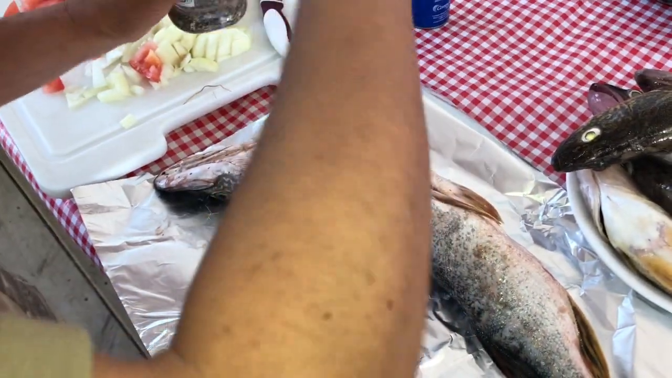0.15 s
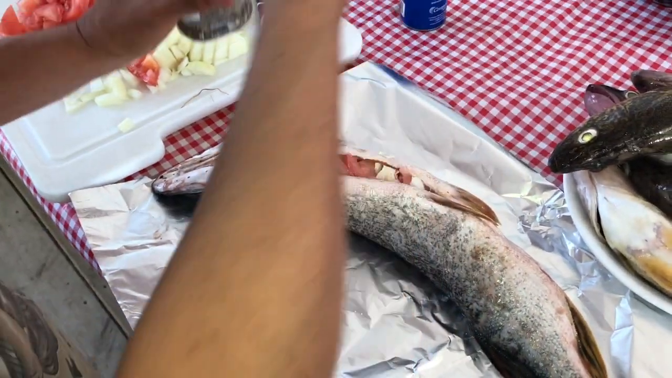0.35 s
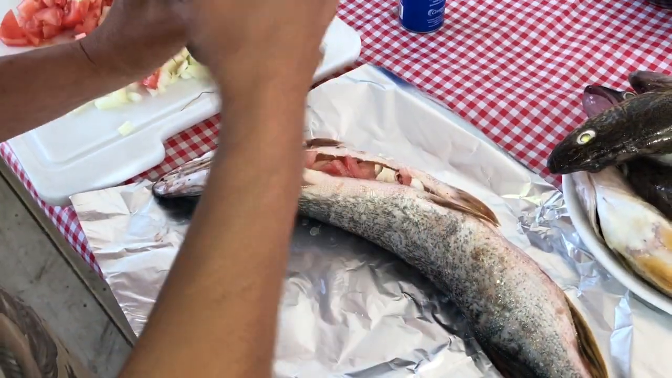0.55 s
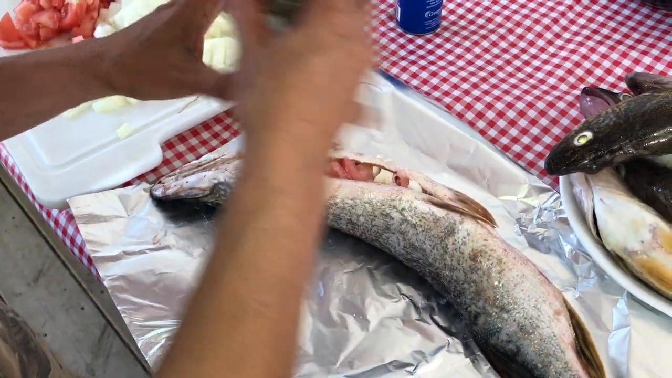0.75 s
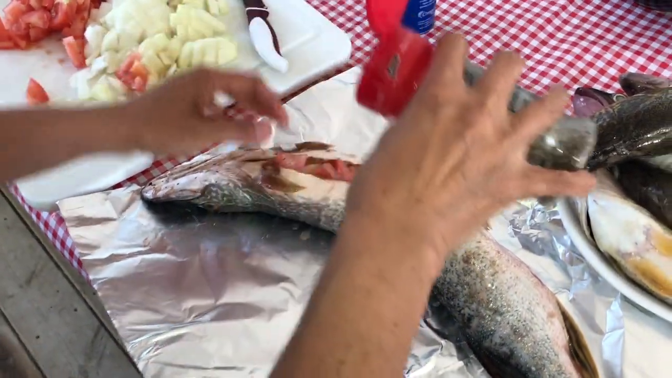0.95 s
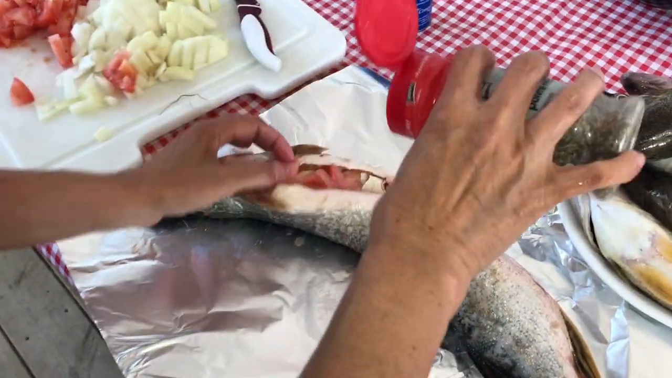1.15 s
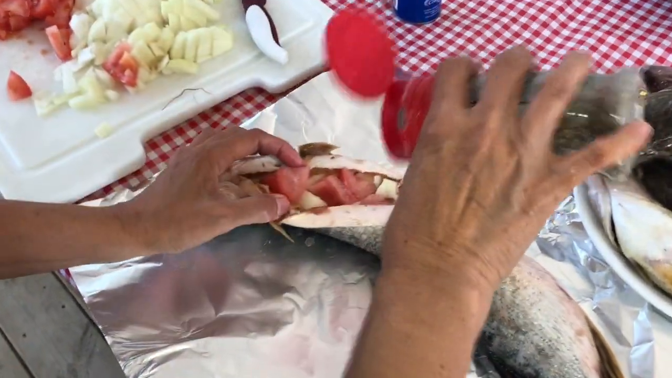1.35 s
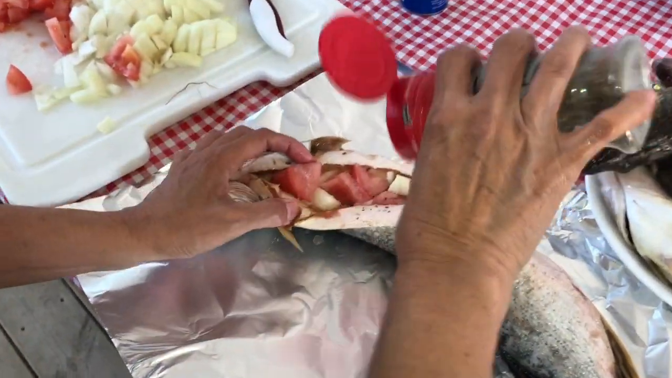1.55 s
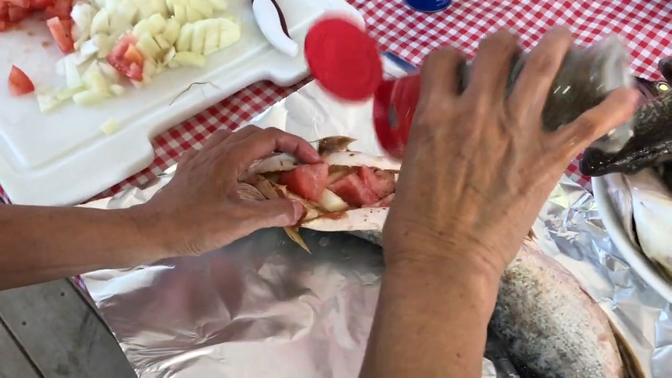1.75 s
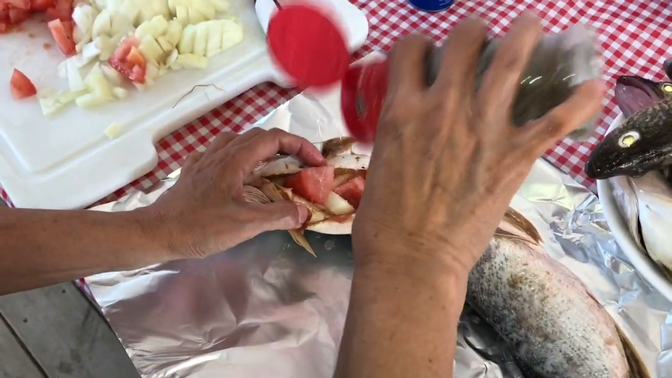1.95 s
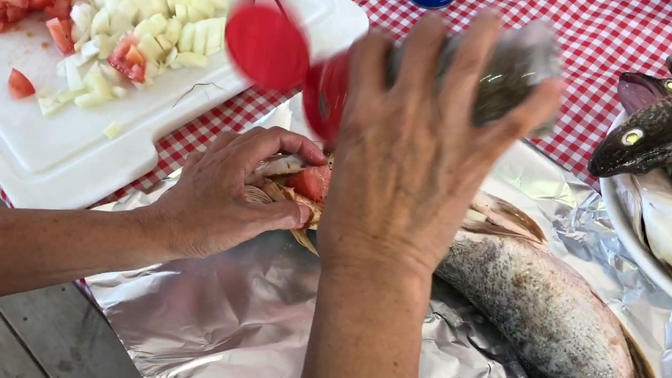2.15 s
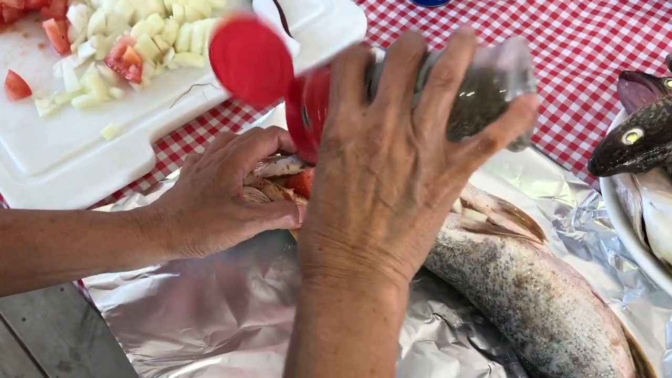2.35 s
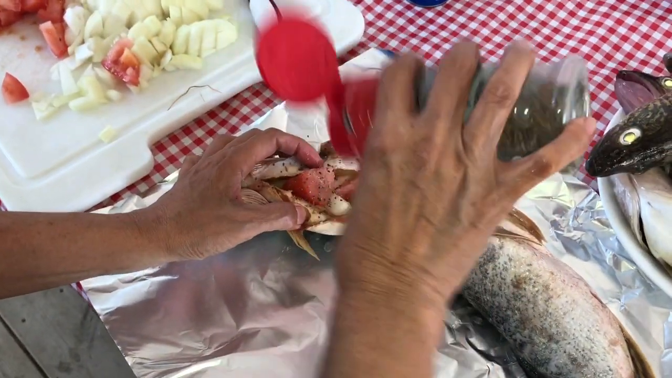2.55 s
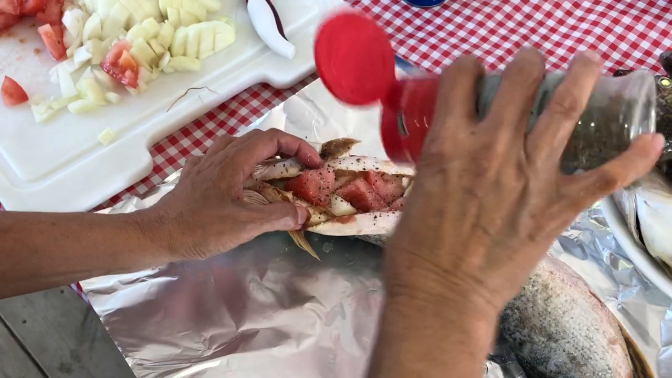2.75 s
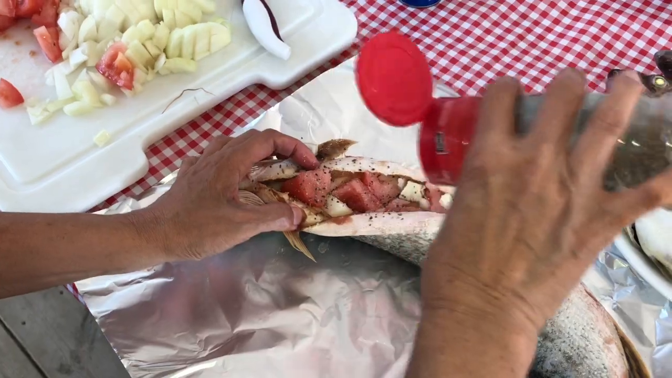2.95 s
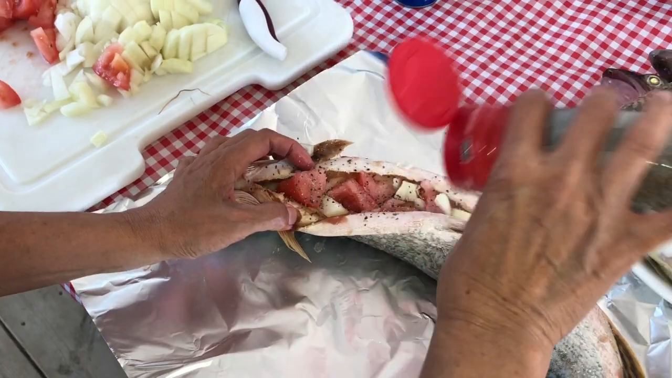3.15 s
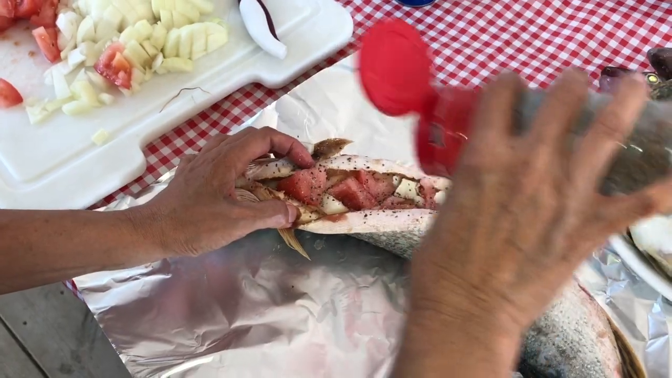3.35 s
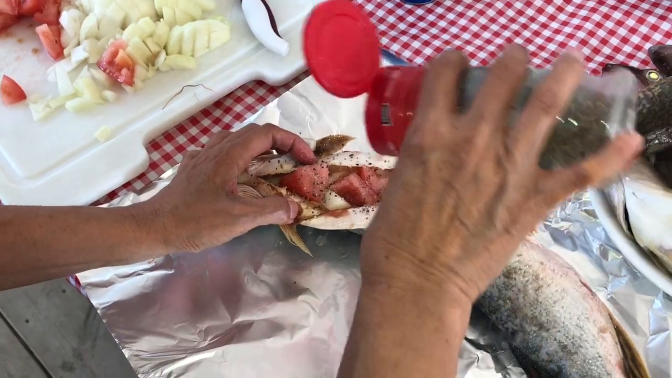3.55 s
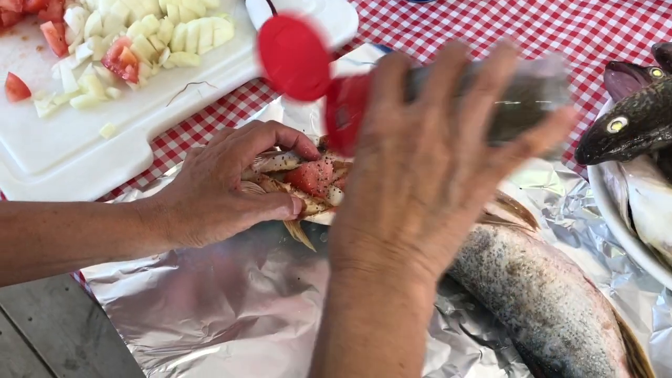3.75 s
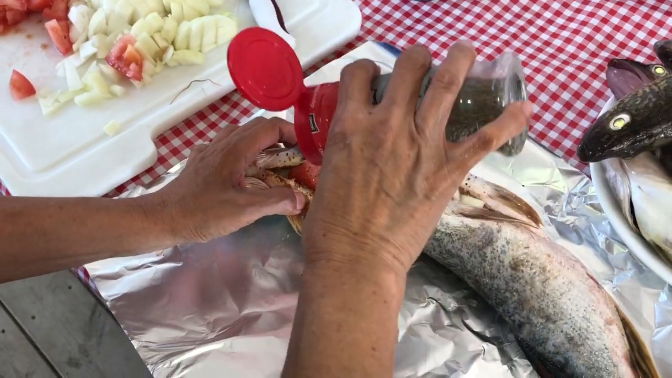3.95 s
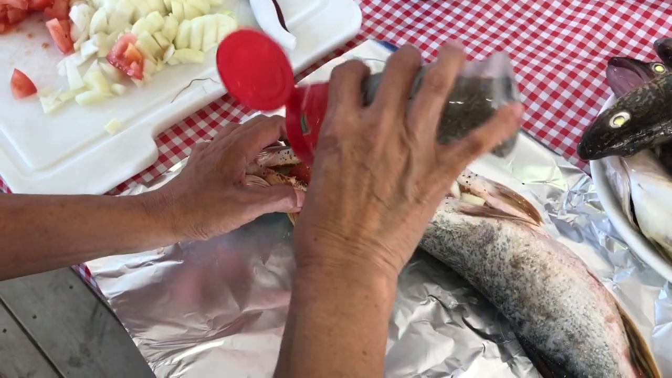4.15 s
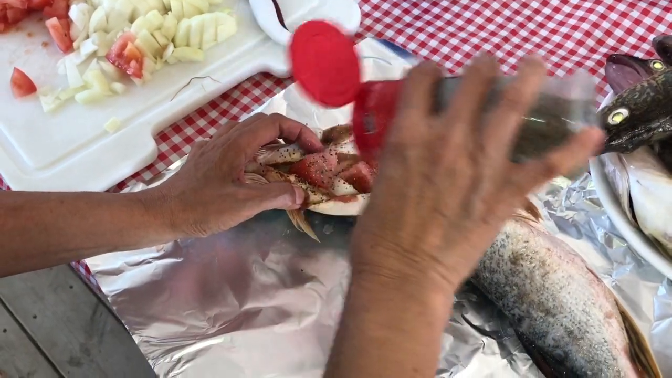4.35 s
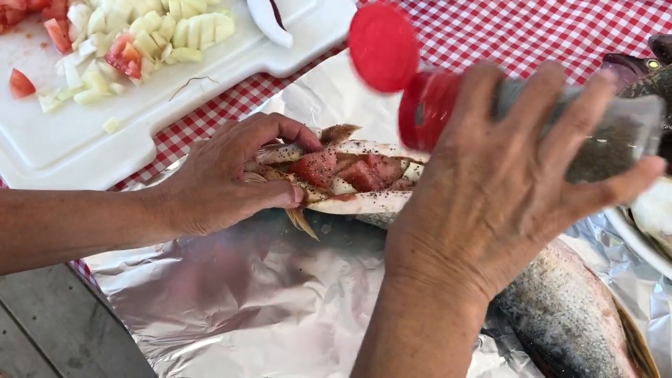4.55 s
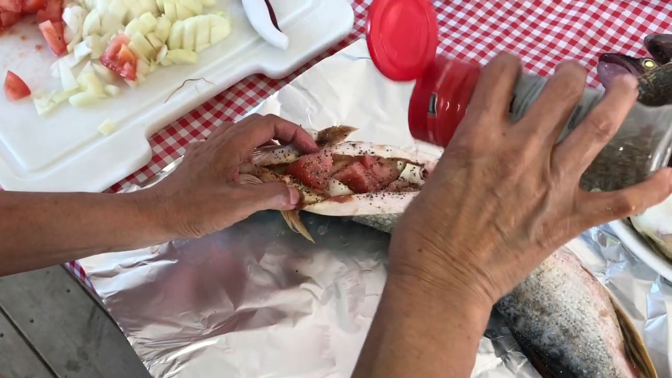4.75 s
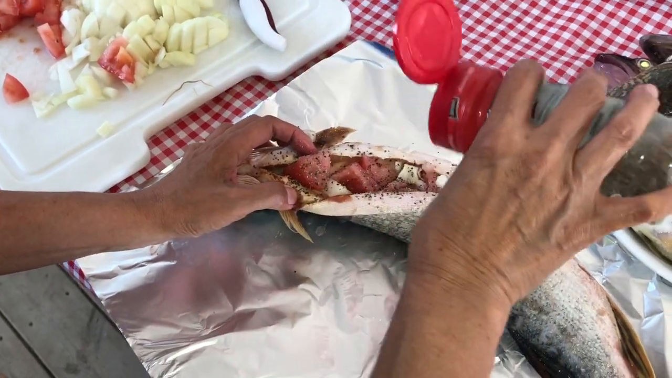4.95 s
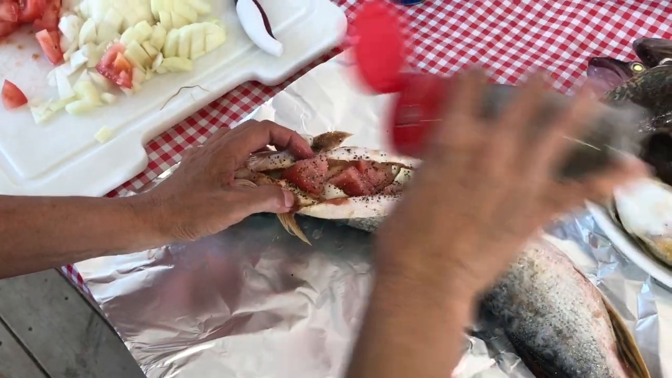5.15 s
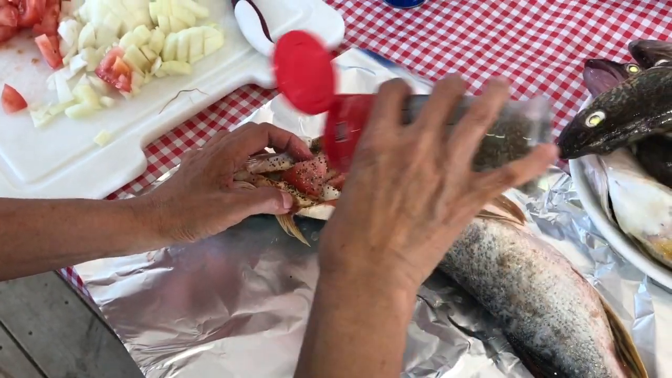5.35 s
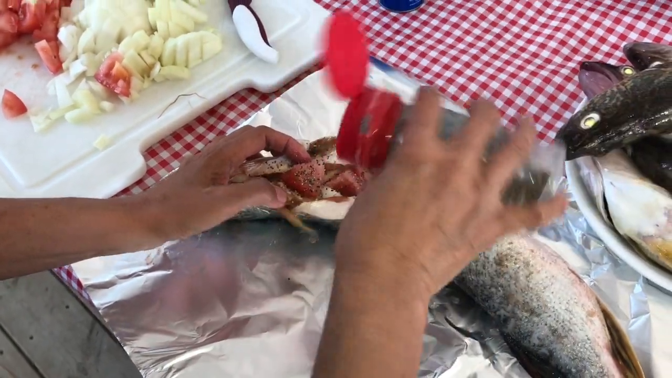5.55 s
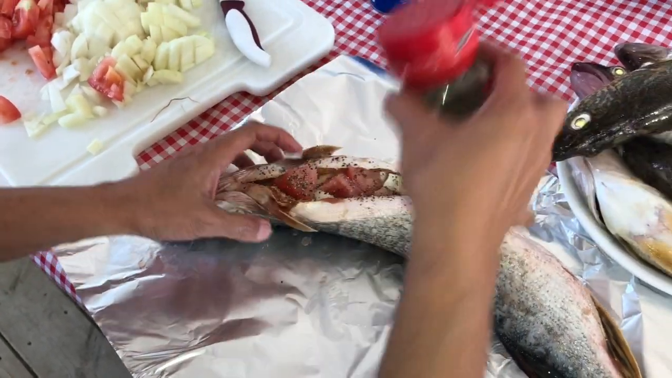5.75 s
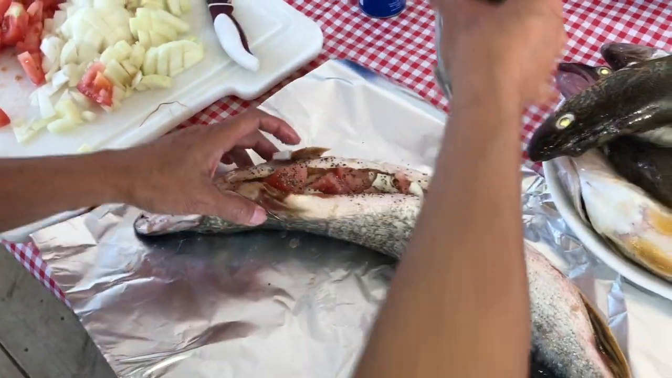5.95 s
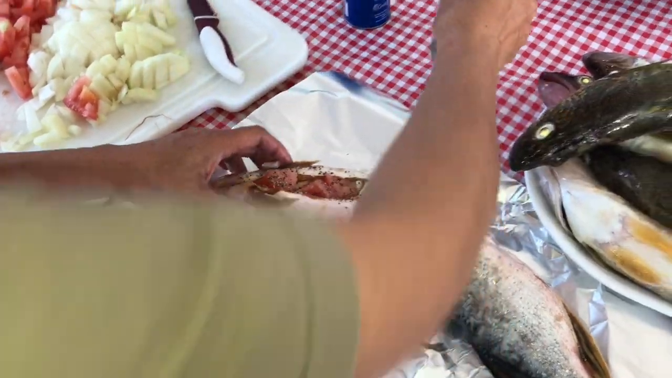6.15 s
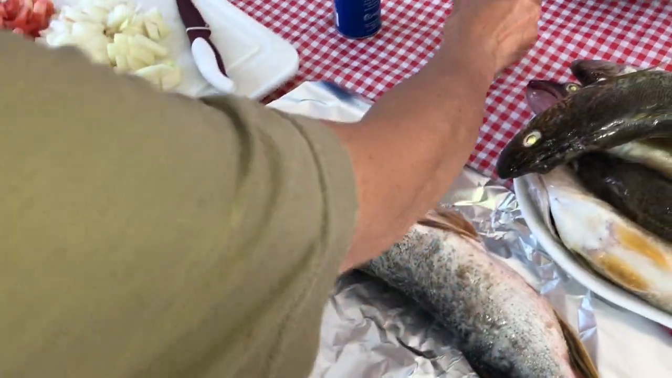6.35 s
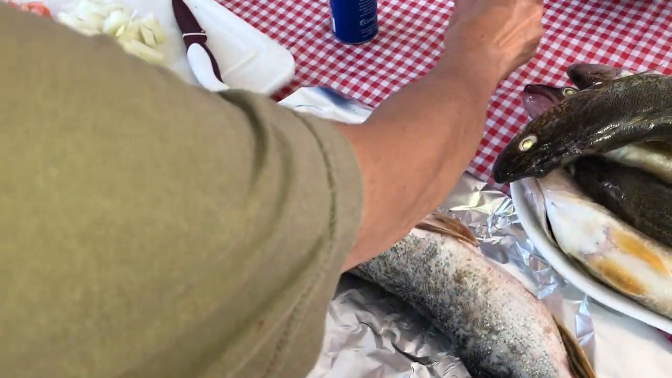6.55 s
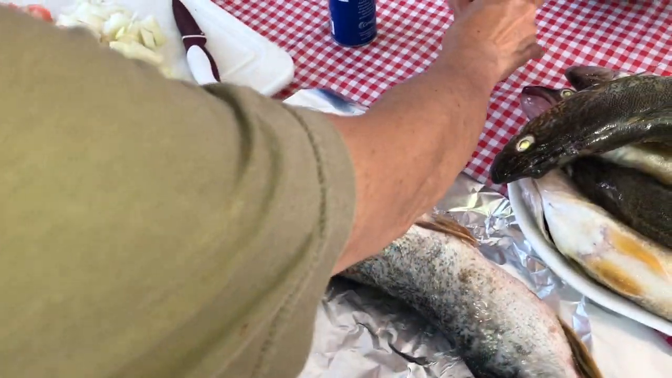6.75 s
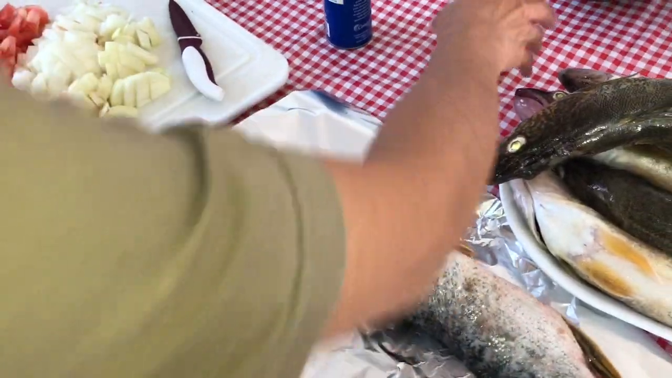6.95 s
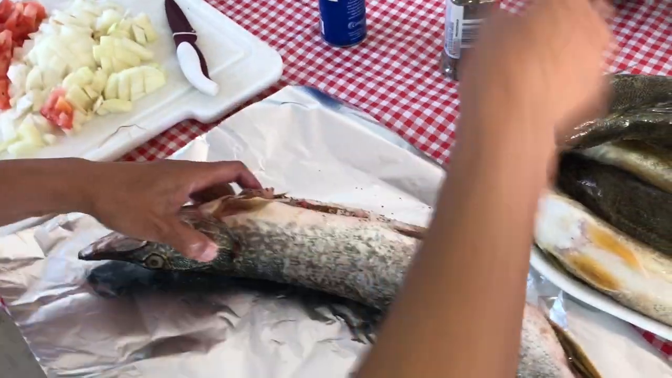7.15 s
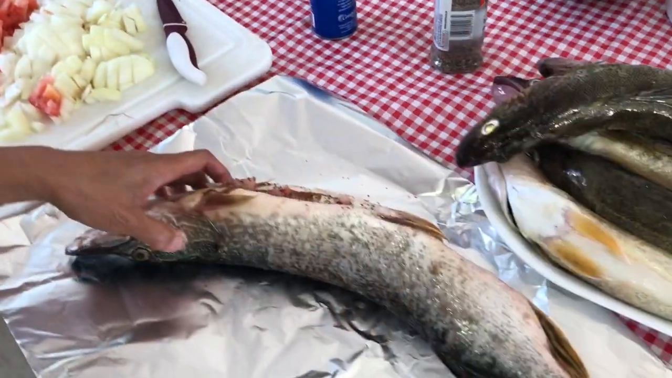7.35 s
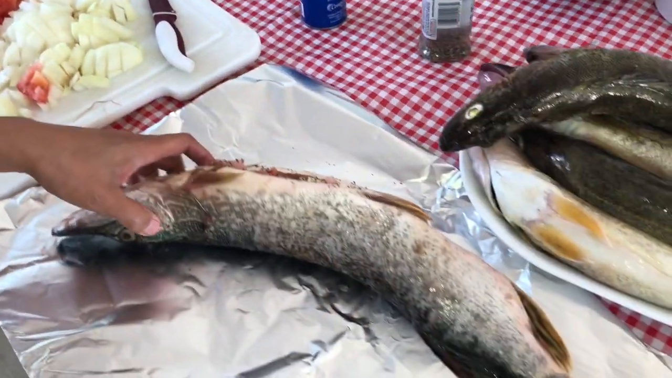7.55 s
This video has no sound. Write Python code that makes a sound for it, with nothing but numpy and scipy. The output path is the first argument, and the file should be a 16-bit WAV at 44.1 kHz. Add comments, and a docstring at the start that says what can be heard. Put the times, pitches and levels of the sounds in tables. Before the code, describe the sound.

Close, dry outdoor sound: a steady low motor hum and distant rumble, with a very faint cicada. Light finger ticks come first, then foil snaps and rustles. A jar of coarse pepper is shaken about five times a second in soft grainy swells, with a brief pause. A closer cicada takes over. The jar is knocked down and its lid snaps shut, then foil crumples sharply to the end.

```python
"""A motor hums over a far rumble, with a faint far cicada and light finger ticks; then foil starts to snap.
Coarse pepper is shaken from a plastic jar over a fish on foil: swells of noise patter as the grains slide.
Foil is crumpled (clumped noise), snaps (click, bright noise, modes) and pops (short mode clusters).
The jar is put down and its lid clicked shut: ringing modes, noise clatter, low sine jolts in the table.
The far cicada fades and a nearer one takes over, both as harmonics of an even click rate."""
import sys
import numpy as np
from scipy import signal
from scipy.fft import rfft, irfft, next_fast_len
from scipy.io import wavfile

SR = 44100
rng = np.random.default_rng(int(sys.argv[2]) if len(sys.argv) > 2 else 0)


def attenuation_scalar(level_db):
    """Turn a level in dB into a linear amplitude multiplier (20 dB per decade)."""
    decades = np.asarray(level_db, float) / 20
    return 10 ** decades


def log_audio(samples):
    """Write samples as a 16-bit WAV file to the path given in sys.argv[1]."""
    # one column per channel
    frames = np.atleast_2d(samples).T
    # limit to full scale, then quantise
    limited = np.clip(frames, -1, 1)
    pcm = np.round(limited * 32767).astype(np.int16)
    wavfile.write(sys.argv[1], SR, pcm)


N = 338688

# far rumble and hiss, spectrum: (frequency [Hz], relative density [dB per Hz])
AIR_SPECTRUM = [(30, -28), (45, -17), (85, -15), (140, -3), (175, -9.5), (230, -13.5), (280, -23.5),
                (345, -17), (460, -17.5), (645, -24.5), (900, -27), (1500, -33.5), (3000, -41), (7500, -44),
                (9500, -50), (15700, -52), (16000, -73)]
AIR_DB, HUM_DB, HUM_HZ = -47, -49.5, 164.3
# faint narrow bands of the motor above its tone: (centre [Hz], width [Hz], level [dB])
MOTOR_NOISE_BANDS = [(484.6, 15, -65.5), (644.8, 17, -66.5)]

# cicada loudness: (time [s], level [dB])
FAR_CICADA_LEVEL = [(0, -76.5), (3.0, -73), (3.5, -99)]
NEAR_CICADA_LEVEL = [(3.5, -99), (3.75, -64), (4.5, -64.5), (5.5, -63), (6.501, -61.5), (7.4, -63.5)]
# cicada click rates: (time [s], rate [clicks/s])
FAR_CLICK_RATE = [(0, 204.7), (3.0, 205)]
NEAR_CLICK_RATE = [(3.7, 174.8), (4.1, 175.3), (4.5, 175.8), (4.9, 176.2), (5.5, 176.6), (6.5, 177.05),
                   (7.5, 177.2)]
# tymbal resonance: (frequency [Hz], relative level [dB])
TYMBAL_RESPONSE = [(4900, -17), (5600, -1.5), (6800, 0), (7500, -1), (8100, -1), (8900, -5), (10500, -8)]
# near-cicada harmonics that stand out a while: (multiple of click rate, middle [s], half length [s], lift [dB])
NEAR_STANDOUT = [(31, 6.6, .8, 7), (32, 4.6, .9, 6), (36, 4.6, .35, 12), (41, 6.8, 1.5, 13),
                 (43, 5.4, 1.9, 10), (44, 4.85, .3, 9), (47, 4.35, .3, 11)]

# ticks of fingers on lid and foil: (time [s], rate [ticks/s])
FINGER_TICK_RATE = [(0, 5.5), (.5, 3.4), (.7, 26), (1.2, 29), (1.4, 6.9)]
TICK_BASE_DB = -42

# foil snaps: (time [s], strength [dB], strongest frequency [Hz], tail t60 [s])
FOIL_SNAPS = [(0.1167, -44, 8600, 0.037), (0.551, -37.5, 7300, 0.065), (0.643, -43, 11900, 0.11),
              (1.1928, -40, 3470, 0.019), (1.21, -34, 5000, 0.064), (1.2259, -27.5, 3360, 0.041),
              (1.25, -31.5, 8100, 0.026), (1.268, -33, 5460, 0.066), (1.295, -39, 3260, .05),
              (1.3178, -33.5, 3130, 0.038), (1.3965, -39, 4070, 0.17), (1.5049, -26, 4770, 0.0025),
              (2.0751, -32, 4870, 0.22), (2.3936, -34.5, 4500, 0.047), (3.0813, -31.5, 5540, 0.1),
              (3.113, -37.5, 5570, 0.2), (3.162, -36, 6260, 0.073), (3.205, -38.5, 6100, 0.34),
              (3.323, -31.5, 6700, 0.11), (3.411, -38.5, 9500, 0.098), (3.4708, -41.5, 9300, 0.19),
              (3.5065, -44, 11600, 0.15), (4.155, -32.5, 7840, 0.14), (5.1207, -29, 4200, 0.19),
              (5.1943, -36.5, 3720, 0.24), (5.343, -37, 5940, 0.24), (5.5814, -35, 4200, 0.18),
              (5.716, -44, 3260, 0.12), (5.748, -35, 5900, 0.11), (5.8267, -31.5, 5200, 0.1),
              (5.8644, -32, 3530, 0.055), (5.9, -34.5, 5460, 0.082), (5.958, -29, 2830, 0.22),
              (6.002, -24.5, 6160, 0.05), (6.017, -20, 7530, 0.09), (6.035, -23.5, 8000, 0.076),
              (6.054, -28, 7400, 0.077), (6.179, -26, 5900, 0.17), (6.281, -25, 4240, 0.14),
              (6.351, -29.5, 4980, 0.2), (6.6703, -25.5, 4700, 0.043), (6.6898, -33.5, 5270, 0.13),
              (6.7213, -28, 4960, 0.16), (6.8, -35, 7160, 0.52), (7.1174, -33, 5100, 0.067),
              (7.441, -34, 4040, 0.13), (7.528, -22, 5700, 0.096), (7.5526, -15, 6550, 0.16)]
# click over tail for t60 0.1 s and strength -34 dB; longer tails and stronger snaps start softer
CLICK_DB, CLICK_DB_PER_DOUBLED_T60, CLICK_DB_PER_STRENGTH_DB = 2.5, -2, -0.2
# popping foil dents: (time [s], strength [dB], pitch [Hz], t60 [s])
FOIL_POPS = [(.703, -43.5, 4180, 0.011), (1.481, -45, 1010, .03), (1.513, -43.5, 980, 0.041),
             (5.122, -57, 2680, 0.063), (7.4462, -34, 1905, 0.015), (7.452, -33.5, 2090, 0.058),
             (7.468, -35.5, 1590, 0.07), (7.532, -30, 2060, 0.062), (7.575, -28.5, 1914, 0.088),
             (7.646, -28.5, 1740, 0.031)]

# jar shakes, grains hitting the lid end: (middle [s], level [dB])
JAR_SHAKES = [(1.076, -68), (1.58, -58.5), (1.788, -53), (1.942, -55), (2.0, -53), (2.206, -48.5),
              (2.414, -55), (2.608, -52), (2.798, -52.5), (2.965, -57.5), (3.626, -58.5), (3.797, -64),
              (3.96, -65), (4.135, -60.5), (4.335, -55.5), (4.518, -56.5), (4.689, -58), (4.877, -55),
              (5.037, -56.5), (5.297, -57.5), (5.526, -59), (5.656, -58)]
# grain patter spectrum: (frequency [Hz], relative density [dB per Hz])
GRAIN_SPECTRUM = [(1000, 0), (1800, -6), (2600, -1), (5000, 1.5), (6700, -0.5), (11000, -1.5), (15700, -4),
                  (16000, -30)]
SHAKE_HALF_S = 0.033  # middle to 1/e of the amplitude
SLIDE_LEAD_S, SLIDE_DB = 0.056, -4.5  # a weaker slide leads each shake

# foil dragged and crumpled under hand and arm: (start [s], hold [s], level [dB])
FOIL_CRUMPLES = [(1.22, 0.14, -55), (1.407, 0.067, -60.5), (3.21, 0.071, -63), (3.388, 0.082, -66),
                 (5.712, 0.38, -51.5), (6.173, 0.25, -50.5), (6.689, 0.19, -41), (6.882, 0.033, -38),
                 (6.975, 0.061, -51.5), (7.055, .005, -44.5), (7.117, 0.018, -45.5), (7.179, 0.021, -35),
                 (7.477, 0.0046, -45), (7.572, 0.0084, -31), (7.635, 0.046, -38.5)]
# crumpling foil spectrum: (frequency [Hz], relative density [dB per Hz])
RUSTLE_SPECTRUM = [(410, -34), (700, 0.5), (1370, 1), (2390, 7.5), (5430, 9), (9100, 3), (15200, -4),
                   (15800, -8), (16100, -47)]
CRUMPLE_RISE_DB_PER_S, CRUMPLE_FALL_DB_PER_S = 431, 231

# knocks on jar and table: (time [s], strength [dB], contact cut-off [Hz], clatter t60 [s])
JAR_KNOCKS = [(2.163, -30, 1300, 0.33), (2.18, -31.5, 1300, 0.13), (2.198, -31.5, 1300, 0.56),
              (2.45, -40, 2530, 0.24), (3.049, -39.5, 1480, 0.48), (3.532, -36, 1850, 0.14),
              (6.37, -31.5, 3000, 0.055), (6.3727, -14, 750, 0.13), (6.5652, -8.5, 16200, 0.013),
              (6.5762, -23.5, 12800, 0.13), (6.5793, -16.5, 1960, 0.2), (6.601, -35, 2200, 0.1)]
# jar modes: (frequency [Hz], relative level [dB], t60 [s])
JAR_MODES = [(265, -22, 0.23), (496, -4, 0.094), (773, -3.5, 0.1), (1073, -12.5, 0.1), (1192, -9, .08),
             (1244, -6, 0.059), (1454, -12, 0.13), (1600, 14, 0.0035), (1710, -10, 0.06), (2220, -10, .1),
             (2540, -8, 0.09), (3570, 2, 0.0068), (14400, 7.5, 0.0033)]
# jolts through table and microphone stand: (time [s], level before the swell [dB], pitch [Hz], t60 [s])
TABLE_BUMPS = [(2.164, -22, 280, 0.075), (2.172, -25.5, 87, .17), (2.178, -28, 193, 0.11),
               (2.196, -26.5, 244, 0.12), (2.237, -24, 81, 0.13), (2.196, -27.5, 49.7, 0.43),
               (2.284, -26, 80, 0.1), (6.376, -19, 274, 0.044), (6.3816, -22.5, 173, 0.053),
               (6.5672, -16.5, 383, 0.018), (6.577, -21, 226, 0.044), (6.578, -30, 110, 0.12)]
BUMP_RISE_S = 0.002


def rms_one(x):
    """Scale to rms 1."""
    return x / np.sqrt(np.mean(x ** 2) + 1e-20)


def in_time(rows):
    """Columns of a curve, one value a sample."""
    time_s, *columns = np.transpose(rows)
    return [np.interp(np.arange(N) / SR, time_s, column) for column in columns]


def at_hz(points, hz):
    """Read a spectrum, linear in dB over log frequency."""
    table_hz, table_db = np.transpose(points)
    return np.interp(np.log(hz), np.log(table_hz), table_db)


def drift(corner_hz):
    """Slow random wander of rms 1: noise through two equal poles, run at SR / 40."""
    pole = np.exp(-80 * np.pi * corner_hz / SR)
    white = rng.standard_normal(N // 40 + 4002)
    slow = signal.lfilter([1], [1, -2 * pole, pole * pole], white)[4000:]  # past the start-up
    return np.interp(np.arange(N) / 40, np.arange(len(slow)), rms_one(slow))


def cut(x, hz, kind, order=2):
    """Butterworth filter."""
    safe_hz = np.clip(hz, 10, .45 * SR)
    return signal.sosfilt(signal.butter(order, safe_hz, kind, fs=SR, output="sos"), x)


def coloured(x, spectrum):
    """Shape white input by a spectrum in dB; rms 1."""
    size = next_fast_len(N)
    hz = np.maximum(np.fft.rfftfreq(size, 1 / SR), 1)
    return rms_one(irfft(rfft(x, size) * attenuation_scalar(at_hz(spectrum, hz)), size)[:N])


def add(out, time_s, sound):
    """Mix a sound in at its time, clipped to the end."""
    at = round(time_s * SR)
    out[at:at + len(sound)] += sound[:N - at]


def contacts(per_s, spread_db, smooth_share, spectrum):
    """Noise whose power is part smooth, part shimmer of tiny unequal contacts (t60 10 ms); rms 1."""
    sizes = attenuation_scalar(spread_db * np.minimum(rng.exponential(1, N), 5))
    hits = sizes * (rng.random(N) < per_s / SR)
    fade = attenuation_scalar(-60 / (0.01 * SR))
    shimmer = rms_one(signal.lfilter([1], [1, -fade], hits))
    envelope = np.sqrt(smooth_share + (1 - smooth_share) * shimmer ** 2)
    return coloured(envelope * rng.standard_normal(N), spectrum)


def motor_hum():
    """A steady motor tone: one sine with slight pitch and level wander."""
    phase = 2 * np.pi * np.cumsum(HUM_HZ + .2 * drift(1.5)) / SR
    return attenuation_scalar(HUM_DB + 1.1 * drift(8.3)) * np.sqrt(2) * np.sin(phase)


def motor_bands():
    """Motor noise through narrow second-order bands."""
    out = np.zeros(N)
    for hz, width_hz, level_db in MOTOR_NOISE_BANDS:
        edges_hz = [hz - width_hz / 2, hz + width_hz / 2]
        out += attenuation_scalar(level_db) * rms_one(cut(rng.standard_normal(N), edges_hz, "band"))
    return out


def air():
    """Far rumble and hiss: shaped noise with a small level flutter."""
    return attenuation_scalar(AIR_DB + .5 * drift(35.0)) * coloured(rng.standard_normal(N), AIR_SPECTRUM)


def cicada(rate, loudness, waver_db, standout=()):
    """A very even click train: its multiples under the tymbal resonance, each fading in and out on the air."""
    (per_s,), (level_db,) = in_time(rate), in_time(loudness)
    t, phase = np.arange(N) / SR, 2 * np.pi * np.cumsum(per_s) / SR
    lift_db = {}
    for k, middle_s, half_s, db in standout:
        lift_db[round(k)] = db * np.exp(-((t - middle_s) / half_s) ** 4)
    out = np.zeros(N)
    for k in range(int(4900 / per_s[0]), int(10500 / per_s[0])):  # multiples within about 4.9-10.5 kHz
        resonance_db = at_hz(TYMBAL_RESPONSE, k * per_s[0])
        gain = attenuation_scalar(resonance_db + waver_db * drift(1.0) + lift_db.get(k, 0))
        out += gain * np.sin(k * phase + 2 * np.pi * rng.random())
    return attenuation_scalar(level_db) * rms_one(out)


def ticks():
    """Lone faint clicks at random moments, each ringing a few cycles high up."""
    per_s, = in_time(FINGER_TICK_RATE)
    sizes = attenuation_scalar(0.57 * np.minimum(rng.exponential(1, N), 3))
    hits = sizes * (rng.random(N) < per_s / SR)
    dealt, out = rng.integers(0, 4, N), np.zeros(N)
    for k, hz in enumerate((4470, 6500, 9500, 12500)):
        resonator = [1, -1.6 * np.cos(2 * np.pi * hz / SR), .64]
        out += signal.lfilter([1], resonator, hits * (dealt == k) + 1e-18)  # offset avoids denormals
    return attenuation_scalar(TICK_BASE_DB) * out


def snaps(low_hz, width_oct, broad_db, click_t60_s, grain_db, modes_db):
    """A crease buckles: a click, then smaller buckles and dense sheet modes die away as bright noise."""
    out, t = np.zeros(N), np.arange(round(.2 * SR)) / SR
    for time_s, strength_db, centre_hz, t60_s in FOIL_SNAPS:
        uneven_db = grain_db * np.repeat(rng.standard_normal(len(t) // 60), 60)
        noise = rng.standard_normal(len(t)) * attenuation_scalar(uneven_db - 60 * t / t60_s)
        band = cut(noise, centre_hz * 2 ** np.array([-width_oct, width_oct]), "band", order=1)
        broad = attenuation_scalar(broad_db - 14.0 * t / t60_s) * noise  # dies sooner than the band
        modes_hz = centre_hz * 2 ** (width_oct * rng.uniform(-0.75, 1, 9))
        rings = np.sin(2 * np.pi * np.outer(modes_hz, t)).sum(axis=0)
        tail = band + broad + attenuation_scalar(modes_db - 60 * t / t60_s) * rings
        click_db = CLICK_DB + CLICK_DB_PER_DOUBLED_T60 * np.log2(10 * t60_s)
        click_db += CLICK_DB_PER_STRENGTH_DB * (strength_db + 34)
        click = attenuation_scalar(click_db - 60 * t / click_t60_s) * np.cos(2 * np.pi * centre_hz * t)
        add(out, time_s, attenuation_scalar(strength_db - 7.0) * cut(tail + click, low_hz, "high", order=3))
    return out


def pops():
    """A dent flips and rings briefly in a cluster of uneven modes around and above its pitch."""
    out, t = np.zeros(N), np.arange(round(.06 * SR)) / SR
    for time_s, strength_db, hz, t60_s in FOIL_POPS:
        octaves = rng.uniform([-.3, -.1, .1, .4, .9], [-.1, .1, .4, .9, 1.6])
        weights = 2 ** -np.abs(octaves)
        rings = weights @ np.sin(2 * np.pi * hz * np.outer(2 ** octaves, t))
        add(out, time_s, attenuation_scalar(strength_db - 60 * t / t60_s) * rings / 2)
    return out


def shakes():
    """The heap of grains slides along the wall, then piles up: two swells of fine patter."""
    t, power = np.arange(N) / SR, np.zeros(N)
    for time_s, level_db in JAR_SHAKES:
        for middle_s, db in ((time_s - SLIDE_LEAD_S, level_db + SLIDE_DB), (time_s, level_db)):
            power += attenuation_scalar(2 * db) * np.exp(-2 * ((t - middle_s) / SHAKE_HALF_S) ** 2)
    patter = contacts(per_s=900.0, spread_db=7.5, smooth_share=0.85, spectrum=GRAIN_SPECTRUM)
    return np.sqrt(power) * attenuation_scalar(2.4 * drift(45)) * patter


def rustle():
    """Creases give way in quick clumps; each crumple rises fast, holds and dies away."""
    t, power = np.arange(N) / SR, np.zeros(N)
    for start_s, hold_s, level_db in FOIL_CRUMPLES:
        before_db = CRUMPLE_RISE_DB_PER_S * np.maximum(start_s - t, 0)
        after_db = CRUMPLE_FALL_DB_PER_S * np.maximum(t - start_s - hold_s, 0)
        power += attenuation_scalar(2 * (level_db - np.minimum(before_db + after_db, 120)))
    body = contacts(per_s=1000.0, spread_db=3.0, smooth_share=0.67, spectrum=RUSTLE_SPECTRUM)
    clumps = attenuation_scalar(1.5 * drift(50))
    return np.sqrt(power) * clumps * body


def knocks(clatter_db):
    """Each blow rings the jar's modes and shakes a dying clatter loose; soft contacts are dull."""
    out, t = np.zeros(N), np.arange(round(.25 * SR)) / SR
    for time_s, strength_db, contact_hz, t60_s in JAR_KNOCKS:
        modes = np.zeros(len(t))
        for hz, mode_db, ring_s in JAR_MODES:
            start_db = mode_db + 1.1 * rng.standard_normal()
            decay_db = 60 * t / min(ring_s, 2 * t60_s)
            modes += attenuation_scalar(start_db - decay_db) * np.sin(2 * np.pi * hz * t)
        clatter = rng.standard_normal(len(t)) * attenuation_scalar(-5.5 - 60 * t / t60_s)
        impact = -1.4 * attenuation_scalar(-60 * t / 0.00046)
        sound = cut(modes / 3 + attenuation_scalar(clatter_db) * (clatter + impact), contact_hz, "low", order=3)
        # a light touch moves too little mass to reach the low modes
        low_hz = 120 if strength_db > -33 else 550
        add(out, time_s, attenuation_scalar(strength_db) * cut(sound, low_hz, "high", order=3))
    return out


def bumps():
    """Each jolt swells in a few ms and rings low."""
    out, t = np.zeros(N), np.arange(round(.3 * SR)) / SR
    for time_s, level_db, hz, t60_s in TABLE_BUMPS:
        swell = 1 - np.exp(-t / BUMP_RISE_S)
        add(out, time_s, attenuation_scalar(level_db - 60 * t / t60_s) * swell * np.sin(2 * np.pi * hz * t))
    return out


def scene():
    """Everything reaches one microphone."""
    background = motor_hum() + motor_bands() + air()
    insects = cicada(FAR_CLICK_RATE, FAR_CICADA_LEVEL, waver_db=3.0)
    insects += cicada(NEAR_CLICK_RATE, NEAR_CICADA_LEVEL, waver_db=3.5, standout=NEAR_STANDOUT)
    foil = ticks() + pops() + rustle()
    foil += snaps(low_hz=1640, width_oct=0.75, broad_db=-7.0, click_t60_s=0.0034, grain_db=1.5, modes_db=-21.5)
    jar = shakes() + knocks(clatter_db=4.0)
    return (background + insects + foil + jar + bumps())[None]


def low_pass(x):
    """Removes everything above the highest recorded frequency."""
    return signal.sosfilt(signal.butter(12, 17020, fs=SR, output="sos"), x)


def record(dry):
    """The microphone drops the deepest bass and the loudest peaks are rounded."""
    mix = .85 * np.tanh(cut(dry, 35, "high") / .85)
    return low_pass(mix)


dry = scene()
out = record(dry)
log_audio(out)
```